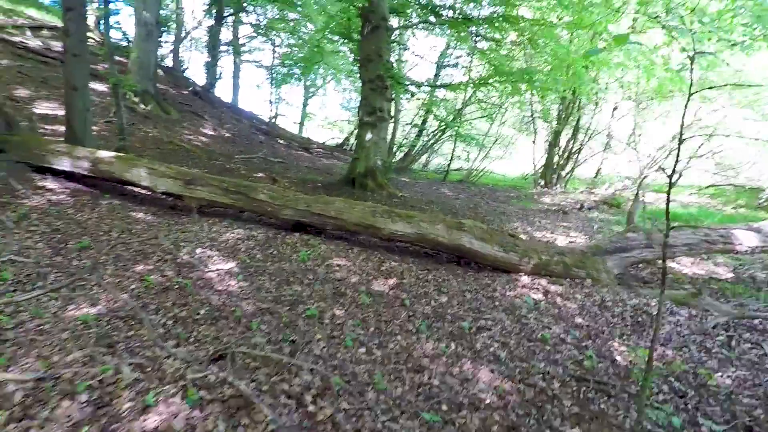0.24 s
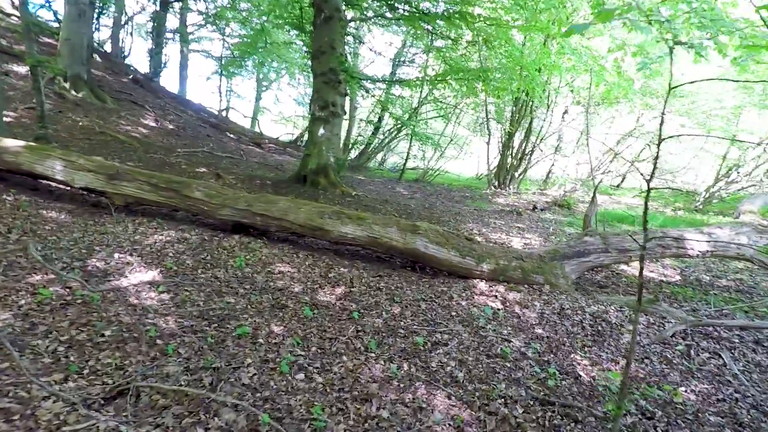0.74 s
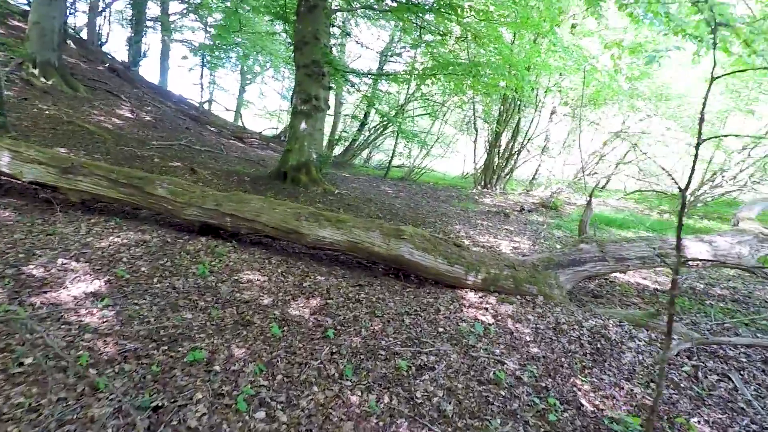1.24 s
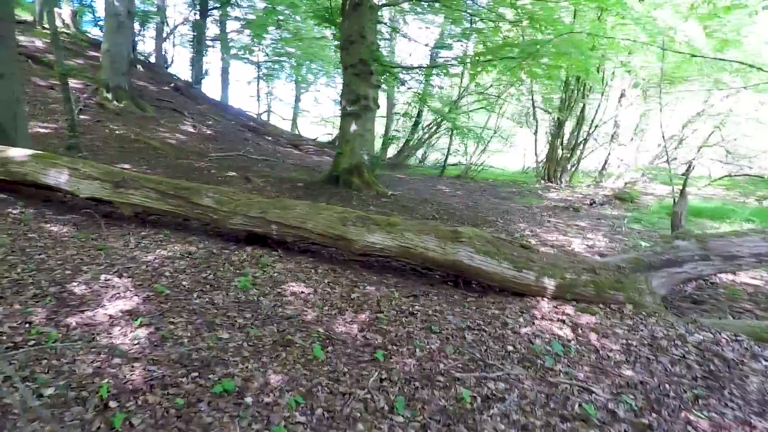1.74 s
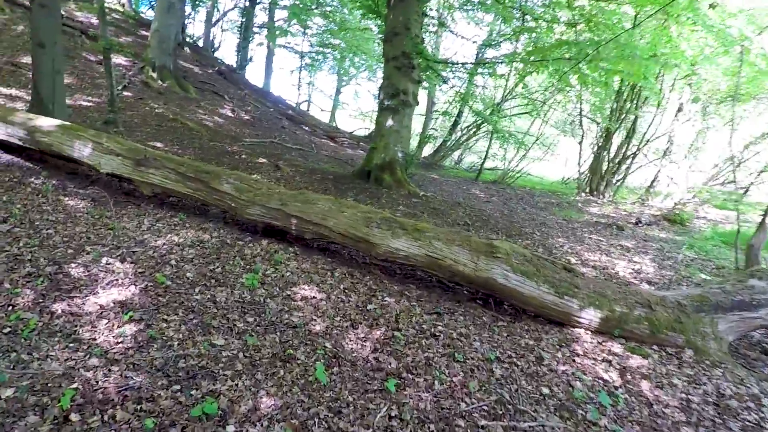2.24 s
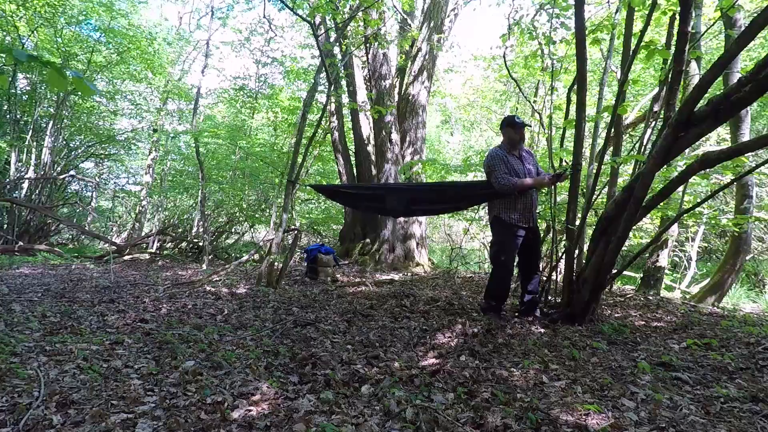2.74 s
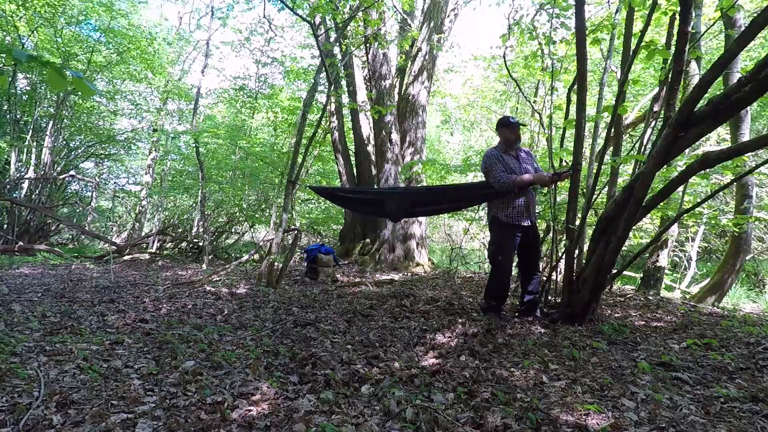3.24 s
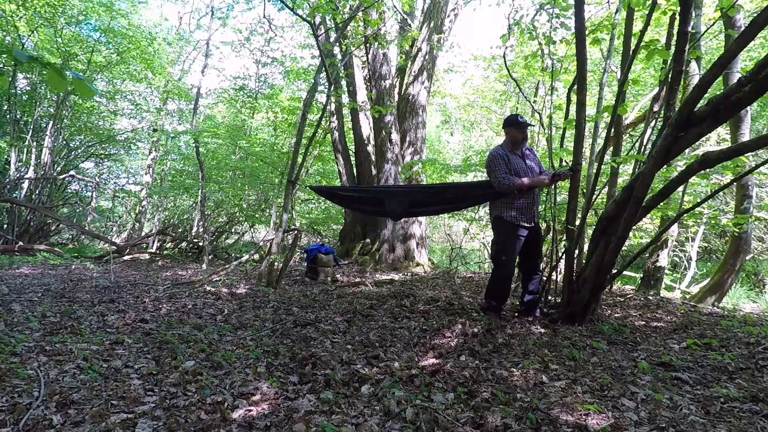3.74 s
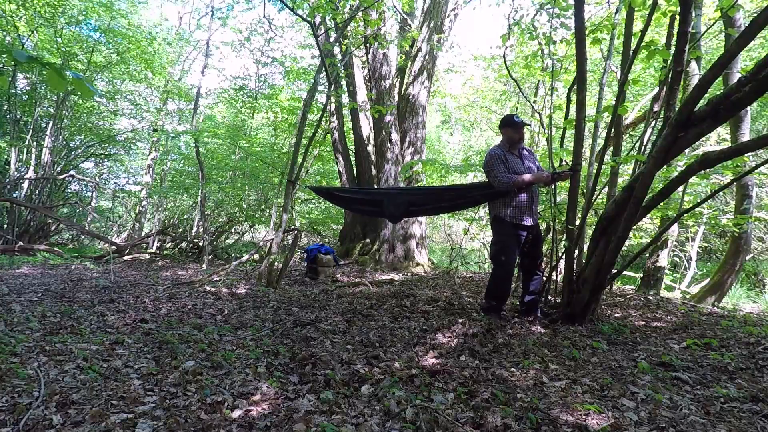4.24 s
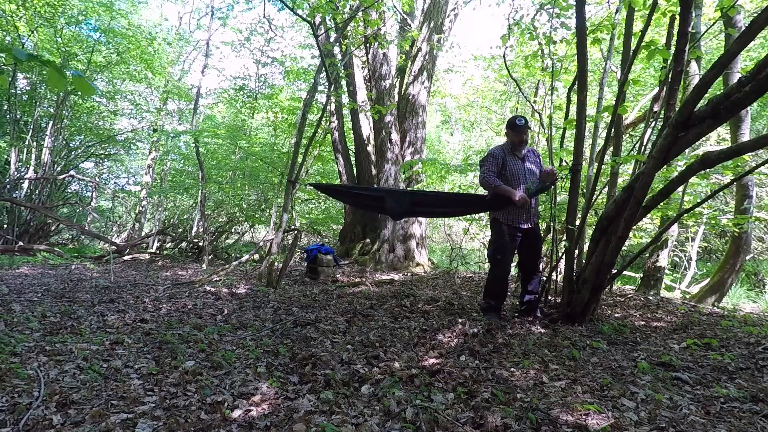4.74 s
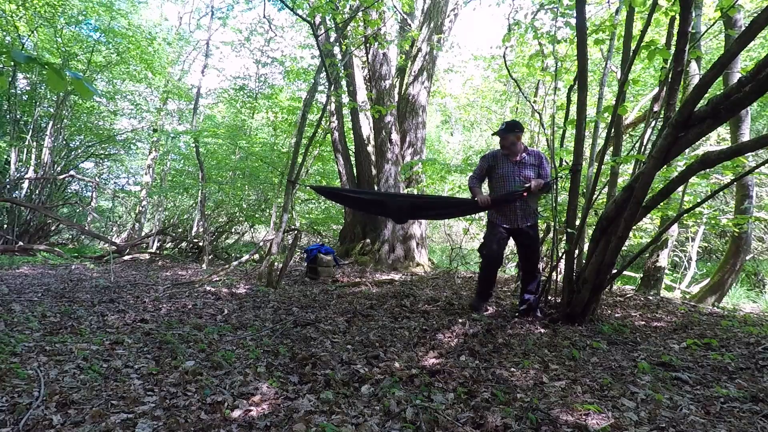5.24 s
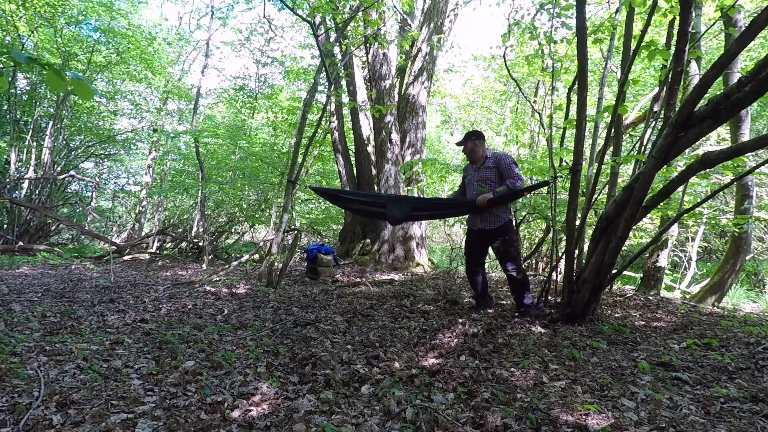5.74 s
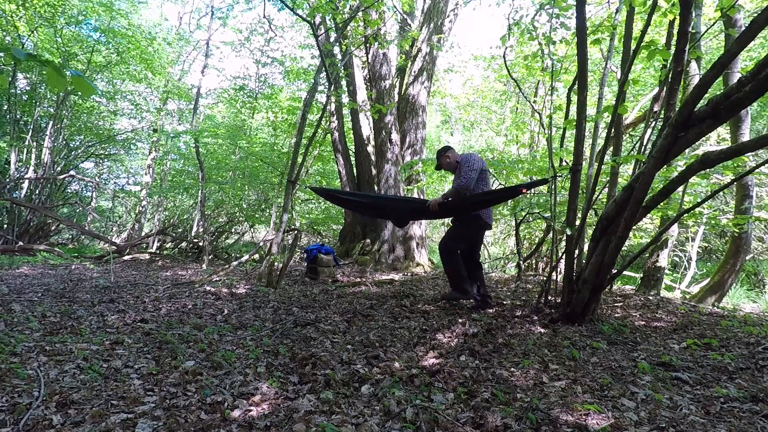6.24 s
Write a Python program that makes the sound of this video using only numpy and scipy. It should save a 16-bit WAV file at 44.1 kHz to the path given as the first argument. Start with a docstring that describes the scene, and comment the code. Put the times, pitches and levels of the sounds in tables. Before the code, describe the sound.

Feet plough through dry leaves right by the microphone, crunching, scuffing and snapping twigs, while the handheld camera knocks and rumbles. The walking stops abruptly at a cut, leaving soft forest air and a small songbird's high, quick phrase echoing among trunks. Faint birds whistle farther off, and late on a distant foot rustles leaves and breaks a twig.

```python
"""A walker carries a camera through dry leaves: cracks and noise bursts crunch and scuff close underfoot,
short bursts ring as snaps, decaying modes knock in the camera body, shaped noise rumbles and hums low.
Far whistles glide through air noise, and a songbird's sine notes begin, answered and echoed by trunks.
The walk then cuts to a still view of the wood, where air, song and whistles go on.
Late on, a far foot shuffles in the leaves and breaks a twig: a short ring and a fading shower of bits."""
import sys
import numpy as np
from scipy import signal
from scipy.fft import rfft, irfft, next_fast_len
from scipy.io import wavfile
from scipy.ndimage import uniform_filter1d, map_coordinates

SR = 44100
rng = np.random.default_rng(int(sys.argv[2]) if len(sys.argv) > 2 else 0)


def generate_wav(sig):
    """Save sig (samples, or channels by samples) to the path in sys.argv[1] as 16-bit PCM at SR."""
    pcm = np.round(np.clip(np.atleast_2d(sig).T, -1, 1) * 32767).astype(np.int16)
    wavfile.write(sys.argv[1], SR, pcm)


def undo_db(level):
    """Turn decibels back into plain size, where 20 dB means ten times bigger."""
    steps = np.asarray(level, float) / 20
    return 10 ** steps


N = 286209
T = np.arange(N) / SR
CUT_S = 2.571  # from the walk to the still view


def unit(x):
    """Scale to rms 1."""
    return x / np.sqrt(np.mean(x ** 2) + 1e-20)


def along(points, hz):
    """Each column after the frequency, read on a log axis."""
    f, *cols = np.transpose(points)
    return [np.interp(np.log(hz + 1), np.log(f + 1), c) for c in cols]


def wobble(rate):
    """A smooth random curve, rate knots a second."""
    return map_coordinates(rng.standard_normal(int(N * rate / SR) + 4), [T * rate])


def filtered(x, response):
    """x times a complex response of frequency."""
    m = next_fast_len(N + 8192)
    return irfft(rfft(x, m) * response(np.fft.rfftfreq(m, 1 / SR)), m)[..., :N]


def bass_cut(x, order=8):
    """High-pass that leaves little sound under 125 Hz."""
    return signal.sosfilt(signal.butter(order, 125, "high", fs=SR, output="sos"), x)


def swell(rows, t=T):
    """Gain of overlapping events, each rising, holding and falling in dB; their powers add."""
    s, below_db, rise, hold, fall = np.abs(np.transpose(rows))[:, :, None]  # levels become dB below 0
    off = np.clip(s - t, 0, None) / rise + np.clip(t - s - hold, 0, None) / fall
    power = undo_db(-2 * (below_db + 20 * off))
    return np.sqrt(np.sum(power, axis=0) + 1e-12)


def ports(a, b, table, colour=((1, 0),)):
    """Two microphone ports hear a shared sound a and an unrelated one b, with lead and balance by pitch."""
    m = next_fast_len(N + 8192)
    hz = np.fft.rfftfreq(m, 1 / SR)
    lead, tilt_db, alike = along(table, hz)
    turn = np.arccos(np.clip(alike, 0, 1)) / 2
    shared = np.cos(turn) * rfft(a, m)
    unlike = np.sin(turn) * rfft(b, m)
    side = undo_db(tilt_db / 2) * np.exp(.5j * lead)
    pair = np.array([(shared + unlike) * side, (shared - unlike) / side])
    return irfft(undo_db(along(colour, hz)[0]) * pair, m)[:, :N]


def hiss(table, colour):
    """Stereo noise of rms 1."""
    return unit(ports(*rng.standard_normal((2, N)), table, colour))


def grains(count, lo_hz, hi_hz, cycles, spread_db):
    """Tiny leaf cracks: damped sines at random times and pitches, a few much louder, rms 1."""
    u = rng.random((count, 3))
    hz = lo_hz + (hi_hz - lo_hz) * u[:, 1:2]
    turns = hz * np.arange(128) / SR
    strength = hz * undo_db(-spread_db * np.log(u[:, 2:] + 0.099))
    cracks = strength * np.exp(-turns / cycles) * np.sin(2 * np.pi * turns)
    at = (u[:, :1] * N).astype(int) + np.arange(128)
    return unit(np.bincount(at.ravel(), cracks.ravel(), N)[:N])


def leaves(table, colour, lo_hz, hi_hz, count, rustle, clump_db):
    """Clumped cracks over a smoother noise rustle, rms 1."""
    clumps = undo_db(clump_db * wobble(90))
    pair = []
    for _ in range(2):
        cracks = grains(count, lo_hz, hi_hz, cycles=1.2, spread_db=3.6)
        pair.append(cracks + rustle * rng.standard_normal(N))
    return unit(clumps * ports(*pair, table, colour))


# the wood all around, at the ports: f/Hz, left lead/rad, left minus right level/dB, likeness [0-1]
AROUND_PORTS = [(50, 3, -19, 0.65), (108, 0.5, 1.5, .1), (232, 3, -1.5, 0.35), (432, 3, 0.5, 0.63),
                (900, 3, 0, 0.91), (1800, 3, -0.5, 0.56), (2390, 2.5, 0, 0.087), (4200, -0.5, -1.5, 0.83),
                (6000, -2.5, -11, 0.036), (10000, 2, -2.5, 0.029)]
# colour of the open air: f/Hz, relative level/dB
AIR_COLOUR = [(30, -34), (80, -30.5), (110, -40), (140, -1), (180, 1), (250, -2.5), (600, -6), (900, -5.5),
              (1800, -15.5), (2500, -20), (4200, -25), (7200, -28), (10000, -23.5), (12000, -34.5),
              (15500, -31)]


def air():
    """The wood's even murmur is shaped noise; a narrow noise band makes a thin high whine in it."""
    whine = filtered(rng.standard_normal((2, N)), lambda f: 1 / (1 + ((f - 9800) / 120) ** 2))
    murmur = undo_db(-47.5 + 1.12 * wobble(3.08)) * hiss(AROUND_PORTS, AIR_COLOUR)
    return murmur + undo_db([[-78], [-72]]) * unit(whine)


def add(out, s, hz, gain):
    """A sine that follows hz, with soft ends, added at time s."""
    k = np.arange(len(hz))
    soft = np.clip(np.minimum(k, k[::-1]) / (0.0027 * SR), 0, 1)
    out[round(s * SR):][:len(hz)] += soft * gain * np.sin(2 * np.pi * np.cumsum(hz) / SR)


def echoes(x, t60):
    """Trunks scatter the sound into a decaying noise tail, redrawn every quarter second."""
    out, t, step = np.zeros((2, N + 2 * SR)), np.arange(SR // 2) / SR, SR // 4
    for i in range(0, N, step):
        tail = rng.standard_normal((2, len(t))) * undo_db(-60 * t / t60) * (1 - np.exp(-t / 0.0015))
        wet = signal.fftconvolve(x[None, i:i + step], tail / np.linalg.norm(tail[0]), axes=1)
        out[:, i:i + wet.shape[1]] += wet
    return out[:, :N]


# the birds in the trees, at the ports: columns as AROUND_PORTS
TREE_PORTS = [(3600, -3, -19, 0.41), (4500, 3, -4, 0.17), (5100, -1.5, -7.5, 0.44), (6460, -1.84, -7, 1),
              (8000, -2, -4, 1)]
# far whistles: start t/s, length t/s, start f/Hz, held f/Hz, held level/dB before the far mix
FAR_WHISTLES = [(0.796, 0.06, 3300, 3780, -49), (1.481, 0.053, 3000, 5015, -46),
                (2.075, 0.19, 4500, 4500, -73), (2.563, .055, 4400, 4400, -51),
                (2.67, 0.13, 4400, 4360, -67), (4.762, 0.12, 4100, 4100, -61), (4.95, .15, 4000, 4000, -64),
                (5.677, 0.053, 5100, 5040, -49), (6.003, 0.15, 7500, 7500, -57),
                (6.17, 0.125, 3430, 3430, -63), (6.218, 0.089, 4200, 4200, -57),
                (6.434, .058, 4550, 4600, -53)]
# longer far calls, one list each: t/s, f/Hz before the waver, level/dB before the far mix
FAR_CALL_CURVES = [
    [(4.42, 3050, -66), (4.455, 3450, -59), (4.475, 3550, -54), (4.495, 3720, -53), (4.52, 3680, -52)],
    [(4.76, 3200, -57), (4.78, 3590, -53), (4.81, 3640, -54), (4.9, 3620, -64), (5.02, 3600, -66)],
    [(6.156, 5150, -51), (6.181, 4800, -52), (6.216, 4690, -45), (6.256, 4760, -57), (6.285, 4740, -59)],
    [(6.317, 4720, -51), (6.342, 4600, -42), (6.36, 4500, -51), (6.369, 4780, -55), (6.397, 4650, -57),
     (6.427, 4560, -52), (6.442, 5120, -49), (6.487, 5080, -58)],
]
# how much each far call wavers: [times WAVER_HZ]
FAR_CALL_WAVER = [.8, .8, 2.4, 2.4]
GLIDE_S, GLIDE_UNDER_DB = 0.026, 3  # a whistle glides to its pitch, starting this much softer
WAVER_HZ = 40  # size of the pitch unsteadiness


def far_birds():
    """Far off, sines glide on to held pitches or follow longer calls, mostly heard as echo."""
    far = np.zeros(N + SR)
    waver = np.pad(WAVER_HZ * wobble(150), (0, SR))
    for start, length, from_hz, held_hz, db in FAR_WHISTLES:
        t = np.arange(round(length * SR)) / SR
        left = np.clip(1 - t / GLIDE_S, 0, 1)
        hz = held_hz + (from_hz - held_hz) * left ** 1.3
        add(far, start, hz + waver[round(start * SR):][:len(t)], undo_db(db - GLIDE_UNDER_DB * left))
    for call, rough in zip(FAR_CALL_CURVES, FAR_CALL_WAVER):
        s, hz, db = np.transpose(call)
        t = np.arange(s[0], s[-1], 1 / SR)
        unsteady = rough * waver[round(s[0] * SR):][:len(t)]
        add(far, s[0], np.interp(t, s, hz) + unsteady, undo_db(np.interp(t, s, db)))
    far = far[:N] * undo_db(1.9 * wobble(70))
    return ports(undo_db(-3.5) * far, 0 * far, TREE_PORTS) + undo_db(-1.0) * echoes(far, 0.68)


# songbird note shapes: t/s from note start, f/Hz before the reach, level/dB over the note's own
NOTE_SHAPES = [
    [(0, 7380, 4), (.015, 7560, -2), (.027, 8500, -12), (.045, 8920, -15), (.062, 8550, -13),
     (.095, 7460, 0.5)],
    [(0, 5820, -8), (.008, 6800, 3), (.016, 7400, 0), (.024, 7370, 2), (.036, 6700, -2), (.047, 6320, -2)],
    [(0, 3600, -12), (.005, 3820, -3.5), (.014, 4200, -9.5), (.022, 4590, 4), (.026, 4720, 2),
     (.03, 5300, -3.5), (.034, 5900, -1)],
    [(0, 6000, -16), (.015, 7150, -2.5), (.045, 7460, -2), (.075, 7300, 3), (.095, 6720, -2),
     (.108, 6000, -5)],
    [(0, 5200, -8), (.007, 6200, 5), (.013, 6580, -8), (.03, 6500, -14), (.05, 6150, 7), (.06, 5250, -1.5),
     (.072, 4600, -1), (.082, 4090, -11), (.092, 3770, -5), (.098, 3550, -19)],
    [(0, 4740, -15), (.015, 5546, -1.5), (.03, 5485, 0), (.06, 4840, -12)],
    [(0, 7730, -6), (.03, 7320, 2), (.07, 7150, -2), (.11, 7000, 2)],
    [(0, 3850, -2), (.013, 3975, -0.5), (.073, 3890, 2.5), (.08, 3800, -8)],
    [(0, 4880, -4), (.012, 4300, 2), (.021, 3980, 2), (.034, 3550, -8)],
    [(0, 2590, -7), (.03, 2950, -1)],
]
# the song, one list for each shape: t/s, level/dB before flutter, reach of the arch [times its top f]
SONG_NOTES = [
    [(2.634, -45, 0.98)],
    [(3.224, -42, 0.98)],
    [(3.321, -46.5, .97), (3.408, -45.5, 1.1), (3.495, -46, 1.02), (3.582, -46.5, 1.01), (3.669, -46, 1.1),
     (3.756, -48.5, 1.0)],
    [(3.832, -42.5, 1.0)],
    [(3.996, -43.5, 1.06), (4.142, -43, 1.05), (4.294, -42.5, 0.99), (4.444, -43, 1.01), (4.595, -44, 1.02)],
    [(4.949, -41, 1.0)],
    [(5.14, -48, 1.0)],
    [(2.785, -47.5, 1.0)],
    [(5.302, -55, 1.0)],
    [(2.282, -53, 0.94)],
]
# first answers from near trunks: delay t/s, level/dB
NEAR_TRUNK_ANSWERS = [(.006, -12.5), (0.011, -18)]


def songbird():
    """Sine notes follow pitch arches, half dry, with quick answers and a tail from the trunks."""
    song = np.zeros(N + SR)
    flutter = 0.76 * wobble(70) + 2.1 * wobble(220)  # leaves in the path make the level uneven (dB)
    for note, rows in zip(NOTE_SHAPES, SONG_NOTES):
        s, hz, db = np.transpose(note)
        t = np.arange(round(s[-1] * SR)) / SR
        smooth = lambda v: uniform_filter1d(np.interp(t, s, v), size=120, mode="nearest")
        for start, level_db, reach in rows:
            arch = np.where(hz > .96 * hz.max(), reach * hz, hz)  # only the top of the arch moves
            uneven_db = flutter[round(start * SR):][:len(t)]
            add(song, start, smooth(arch), undo_db(level_db + smooth(db) + uneven_db))
    song = song[:N]
    answer = lambda f: sum(undo_db(db) * np.exp(-2j * np.pi * f * s) for s, db in NEAR_TRUNK_ANSWERS)
    early = filtered(song, answer)
    return ports(song + early, 0 * song, TREE_PORTS) + undo_db(-2.0) * echoes(song, 0.86)


# a far foot at the ports: columns as AROUND_PORTS
FAR_PORTS = [(250, 1.1, 9, 1), (1200, 0.91, -6, 0.17), (1830, 1.1, 4, 0.82), (2520, -1.1, -3, 1),
             (4200, 0.055, 1.5, 0.92), (6260, -0.94, 0, 0.36), (7300, 0.3, 6, 0.37), (8260, 0.88, 7, 0.5),
             (11700, -0.28, -21.5, 0.12)]
# colour of crunching leaves, near and far: f/Hz, relative level/dB
CRUNCH_COLOUR = [(300, -57), (1500, -9), (2500, -13), (3300, -8.5), (4200, -7.5), (5200, -6.5),
                 (6300, -0.5), (7300, -2.5), (8500, -13.5), (10000, -17.5), (12000, -31.5), (15500, -40)]
# the far foot in the leaves: t/s at full level, level/dB, rise/s, hold/s, fall/s (rise and fall span 20 dB)
FAR_FOOT_SWISHES = [(5.27, -49.5, 0.37, 0.0092, 0.3), (5.56, -42.5, 0.078, .01, 0.46),
                    (5.72, -40.5, 0.05, 0.048, 0.27), (6.05, -49.5, 0.86, 0.0073, 0.36)]
# the twig break: t/s, starting level/dB of the leaf shower, t60/s of the shower
TWIG_BREAK = (5.7312, -27, .13)
# what the twig rings with: f/Hz, level/dB before the bass cuts, t60/s
TWIG_RING = [(276, -20, 0.015), (430, -16.5, 0.008), (1385, -25.5, 0.023), (1780, -26, 0.032),
             (3540, -12, 0.0058), (4400, -23.5, 0.022), (6200, -14, 0.01)]
FAR_RUSTLE_DB = -62


def far_step():
    """A far foot shuffles in the leaves; a twig breaks with a short modal ring and a shower of bits."""
    s, shower_db, shower_t60 = TWIG_BREAK
    t = np.clip(T - s, 0, None)
    ring = np.zeros(N)
    for hz, db, t60 in TWIG_RING:
        fade = undo_db(db - 60 * t / t60) * (1 - np.exp(-4.5 * hz * t))
        ring += fade * np.sin(2 * np.pi * hz * t)
    shuffle = np.hypot(swell(FAR_FOOT_SWISHES), undo_db(FAR_RUSTLE_DB))
    shower = (T > s) * undo_db(shower_db - 60 * t / shower_t60)
    bits = leaves(FAR_PORTS, CRUNCH_COLOUR, 1140, 15400, count=14000, rustle=2.9, clump_db=0.7)
    return bass_cut(bass_cut(ring)) + (shuffle + shower) * bits


# the rumble at the ports: columns as AROUND_PORTS
GRIP_PORTS = [(30, 0.2, -1, 1), (110, 0.3, -.5, 0.63)]
# colour of the rumble: f/Hz, relative level/dB
RUMBLE_COLOUR = [(15, -8), (28, 7.5), (40, 11), (55, -4.5), (78, 8), (95, -11), (110, -16), (140, -56)]
# the rumble through the walk: t/s, level/dB before its wobble
RUMBLE_CURVE = [(0.0, -52), (0.02, -36), (0.22, -49.5), (0.265, -30.5), (.31, -36), (0.4, -45), (0.42, -37),
                (0.52, -47.5), (1.05, -56), (1.11, -51), (1.21, -54.5), (2.53, -66), (2.56, -62)]


def rumble():
    """The hand shakes the camera body: low noise of unsteady level."""
    level = undo_db(np.interp(T, *np.transpose(RUMBLE_CURVE)) + 2.1 * wobble(8.04))
    return level * hiss(GRIP_PORTS, RUMBLE_COLOUR)


# the walker's feet in the leaves: columns as FAR_FOOT_SWISHES, level/dB before the trim in feet()
NEAR_FOOT_SWISHES = [(.184, -27, 0.22, 0.004, 0.1), (.255, -30, 0.071, 0.0033, 0.019),
                     (.343, -33.5, 0.25, 0.079, 0.21), (.6, -39.5, 0.63, 0.15, 0.23),
                     (.943, -31, 0.18, .14, 0.031), (1.178, -34.5, 0.15, 0.0076, 0.29),
                     (1.268, -49, .05, 0.0082, 0.22), (1.518, -46.5, 0.1, 0.0085, 0.19),
                     (1.59, -35, 0.023, 0.16, 0.18), (1.8, -35, 0.088, 0.027, 0.53),
                     (2.198, -68, 0.12, .005, 0.17), (2.305, -41, 0.0089, 0.011, 0.24),
                     (2.36, -25, 0.023, 0.0083, 0.031), (2.38, -47, 0.018, 0.044, 0.091),
                     (2.465, -29, 0.11, 0.03, 0.11), (2.55, -25.5, 0.23, .03, .1)]


def crunch_gain(t=T):
    """The swelling gain of the leaves that the feet plough through."""
    return swell(NEAR_FOOT_SWISHES, t)


# close sounds of the walk at the ports: columns as AROUND_PORTS
NEAR_PORTS = [(40.3, -8, -6, 1), (114, -4.5, -8, 0.8), (154, -0.5, -0.5, 0), (280, 0.5, 1, 0.9),
              (557, 1.2, 2.5, 0.57), (1260, -0.3, -9.5, 0.42), (1760, -5.5, -7.5, 0.95),
              (2560, -6, -4, 0.53), (4200, -7, -1, 0.96), (5200, -8, 2.5, 0.92), (7240, -8.5, 0, 0.96),
              (8300, -8.5, -2.5, 0.46), (12600, -7.5, 2, 0.6)]
# colour of the hum: f/Hz, relative level/dB
HUM_COLOUR = [(100, -65), (135, 2), (160, 5), (200, -5.5), (270, -9.5), (400, -47)]
# the hum: t/s, level/dB when the crunch gain is -52 dB, before its wavering
HUM_CURVE = [(0, -46.5), (.5, -54), (1.3, -50.5), (2.0, -50.5), (2.57, -56)]
HUM_FOLLOWS = 0.088  # share of the crunch's swing in dB that the hum follows


def hum():
    """Low-pitched noise that wavers and slightly follows the crunch."""
    level = undo_db(np.interp(T, *np.transpose(HUM_CURVE))) * (crunch_gain() / undo_db(-52)) ** HUM_FOLLOWS
    level *= undo_db(2 * wobble(8) + 3.5 * wobble(22))
    return level * hiss(NEAR_PORTS, HUM_COLOUR)


# blows on the body: t/s, level/dB, sharpness/dB, sway of the low modes between the ports/rad
BODY_KNOCKS = [(0.128, -27, -4, 0.8), (0.183, -32, -1, 2.2), (0.249, -13, -21, 0.52), (0.261, -11, 13, 1.3),
               (0.399, -25.5, -27, 0.99), (1.086, -39, -24, -0.0012), (1.1, -6.5, 5.5, -0.067),
               (1.171, -27.5, -10, 1.3), (1.845, -39.5, 12, 1.5), (1.855, -41, 12, 1.2),
               (1.984, -30, -18, 1.8), (2.4754, -30.5, 0, 1.4), (2.533, -33, 3, 1.2), (2.563, -34, -3, 1.2)]
# body modes: f/Hz before scatter, level/dB at zero sharpness, t60/s, left lead/rad at zero sway,
# share of sharpness [0-1, squared in use], share of sway [0-1]
BODY_MODES = [(155.2, 1.5, 0.12, -2.5, 0, 0.92), (194, -9.5, 0.16, -2.5, 0.77, 0.3),
              (246, -21, 0.049, 0, 0, 0.1), (342, -11, 0.1, -2.5, 0.6, 0),
              (436, 0, 0.047, -2.5, 0.83, 0.04), (716, -10.5, 0.028, -1.5, 0.58, 0.2),
              (1050, 2.5, 0.012, -2.5, 0.5, 0), (1630, -1, 0.0083, -2.5, 0.96, 0.42),
              (2340, -10, 0.011, -1.5, 0.3, 0)]
MODE_SCATTER = .012  # the grip shifts the body modes from blow to blow (share of pitch)


def knocks():
    """Blows ring the decaying camera body modes; most reach the ports nearly in opposition."""
    out, t = np.zeros((2, N + SR)), np.arange(SR // 3) / SR
    for s, db, sharp_db, sway in BODY_KNOCKS:
        for hz, level_db, t60, lead, share, swing in BODY_MODES:
            fade = undo_db(db + level_db + share ** 2 * sharp_db - 60 * t / t60) * (1 - np.exp(-t / 0.0016))
            shifted_hz = hz * (1 + MODE_SCATTER * rng.uniform(-0.76, 1))
            phase = (lead + swing * sway) * np.array([[.5], [-.5]])
            out[:, round(s * SR):][:, :len(t)] += fade * np.sin(2 * np.pi * shifted_hz * t + phase)
    return out[:, :N]


# what a snap rings with: f/Hz, width of one of two passes f/Hz, level/dB before the treble roll-off
LEAF_RESONANCES = [(990, 2000, 11), (3550, 3900, 7.5), (6090, 1600, 15)]
# the clearest leaf and twig snaps: t/s, drive level/dB of the low, middle and bright resonance
CLEAR_SNAPS = [(.2625, -16, -23, -16), (.319, -38, -22, -39), (.478, -42, -32, -36),
               (0.376, -52, -21.5, -39), (.436, -46, -21, -29), (.511, -48, -23.5, -38),
               (0.62, -30, -21.5, -44), (.652, -22, -25, -40), (0.729, -25, -30, -46),
               (0.7426, -18, -14, -13.5), (0.856, -16, -48, -45), (0.9491, -14.5, -19, -21),
               (.982, -18.5, -20, -18.5), (1.019, -44, -41, -19), (1.071, -24, -37, -27),
               (1.181, -37, -19, -18), (1.271, -46, -18, -22), (1.469, -44, -37, -28),
               (1.59, -43.5, -27, -34), (1.681, -21.5, -36, -42), (1.736, -26, -29, -28),
               (1.7927, -17, -21, -18), (1.845, -27.5, -27, -27), (1.884, -24.5, -31, -35),
               (1.926, -35, -31, -23.5), (2.178, -36, -51, -48), (2.197, -28.5, -50, -55),
               (2.231, -68, -50, -36), (2.248, -55, -50, -32), (2.306, -31, -38, -34),
               (2.3603, -35, -26, -11), (2.391, -36, -43, -12), (2.399, -45, -35, -13),
               (2.4759, -7.5, -21, -1), (2.499, -22.5, -32, -24), (2.5331, -40.5, -6, -3.5),
               (2.563, -28, -30, -16), (5.562, -45, -39, -32), (5.81, -32, -34, -38), (5.96, -39, -30, -36)]
SMALL_SNAP_DB, SMALL_SPREAD_DB = 1, 4  # chance snaps: over the crunch of the moment, scatter of their parts
BITS_UNDER_DB, BITS_T60_S = 20, 0.029  # loose bits patter after each snap


def small_snaps(count):
    """Chance snaps all through the walk, their strength following the crunch around them."""
    s = CUT_S * rng.random(count)
    crunch_db = 20 * np.log10(crunch_gain(s))
    scatter_db = SMALL_SPREAD_DB * rng.standard_normal((count, len(LEAF_RESONANCES)))
    return np.c_[s, crunch_db[:, None] + SMALL_SNAP_DB + scatter_db]


def leaf_ring(f):
    """Each leaf resonance is a band-pass taken twice, with a treble roll-off."""
    rings = []
    for centre, width, db in LEAF_RESONANCES:
        band = 1j * f * width / (centre * centre - f * f + 1j * f * width)
        rings.append(undo_db(db) * band ** 2 / (1 + (f / 11500) ** 4))
    return np.array(rings)


def snaps():
    """Each snap is a short noise burst ringing the three leaf resonances at its own strengths."""
    t, bursts = np.arange(900) / SR, np.zeros((2, 3, N + 900))
    fade = undo_db(-60 * t / 0.0017) + undo_db(-BITS_UNDER_DB - 60 * t / BITS_T60_S)
    for s, *parts_db in [*small_snaps(count=36), *CLEAR_SNAPS]:
        burst = fade * rng.choice([-1, 1], (2, 1, len(t)))
        bursts[..., round(s * SR):][..., :len(t)] += undo_db(parts_db)[:, None] * burst
    x = bass_cut(filtered(bursts[..., :N], leaf_ring).sum(1))
    return ports(*x * (T < CUT_S), NEAR_PORTS) + ports(*x * (T > CUT_S), FAR_PORTS)


# colour of the scuffs: f/Hz, relative level/dB
SCUFF_COLOUR = [(100, -60), (200, 6), (300, 5.5), (600, 2.5), (900, -1), (1300, -4.5), (1800, -4.5),
                (2500, -9.5), (3500, -60), (6000, -60)]
# the sole scuffs the ground: t/s at full level, level/dB
SOLE_SCUFFS = [(0.185, -34), (.258, -40), (.65, -45.5), (.73, -67), (.859, -60), (0.951, -39), (1.11, -45),
               (1.852, -40), (2.189, -41), (2.361, -56), (2.566, -49)]
SCUFF_RISE_S, SCUFF_FALL_S = 0.049, 0.038  # each spans 20 dB
SCUFF_UNDER_DB = 12.5  # the dull part of every swish lies this far under the crunch gain


def feet():
    """Close underfoot, feet plough through leaves: bright cracks and rustle over a duller scuff."""
    crunch = crunch_gain()
    sole = swell([(s, db, SCUFF_RISE_S, 0, SCUFF_FALL_S) for s, db in SOLE_SCUFFS])
    scuff = np.hypot(undo_db(-SCUFF_UNDER_DB) * crunch, sole)
    bright = leaves(NEAR_PORTS, CRUNCH_COLOUR, 1700, 14500, count=7000, rustle=1.0, clump_db=1.5)
    dull = leaves(NEAR_PORTS, SCUFF_COLOUR, 337, 2570, count=4000, rustle=0.88, clump_db=2.5)
    return undo_db(-0.5) * crunch * bright + scuff * dull


def scene():
    """The walk stops dead at the cut; air and birds run through."""
    before = np.clip((CUT_S - T) / 0.0011, 0, 1)
    walk = rumble() + hum() + bass_cut(knocks(), order=2) + feet()
    wood = air() + far_birds() + songbird()
    return wood + (1 - before) * far_step() + before * walk + snaps()


def top_cut(x):
    """Nothing passes above the cut-off."""
    return signal.sosfilt(signal.butter(12, 15800, fs=SR, output="sos"), x)


def record(dry):
    """The converter clips at its ceiling; a steep band limit follows at 15.2 kHz."""
    clipped = np.clip(dry, -1, 1)
    finished = filtered(clipped, lambda hz: 1 / (1 + (hz / 15200) ** 40))
    return top_cut(finished)


dry = scene()
out = record(dry)
generate_wav(out)
```